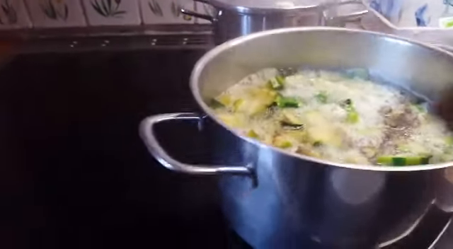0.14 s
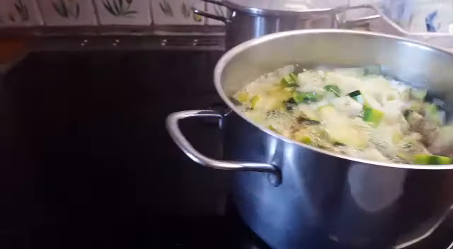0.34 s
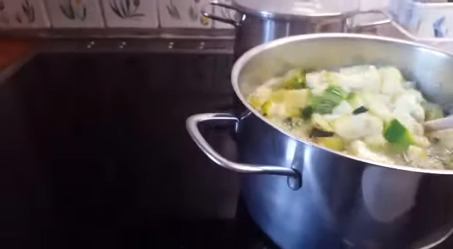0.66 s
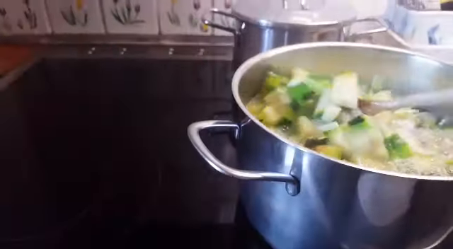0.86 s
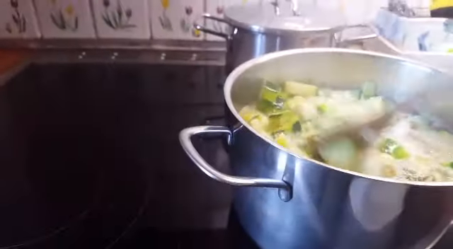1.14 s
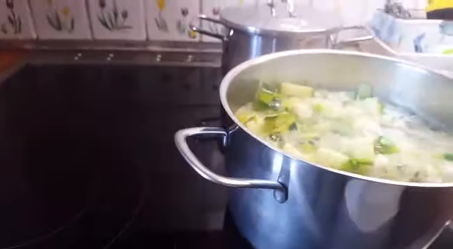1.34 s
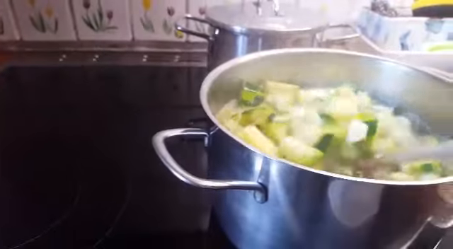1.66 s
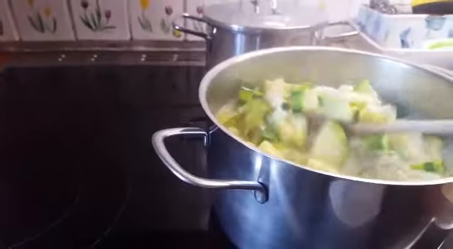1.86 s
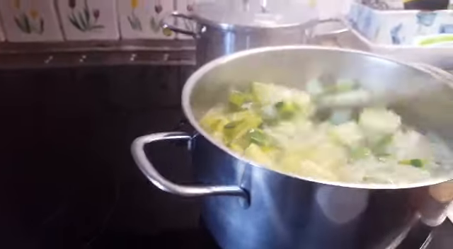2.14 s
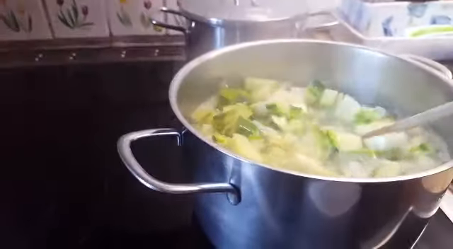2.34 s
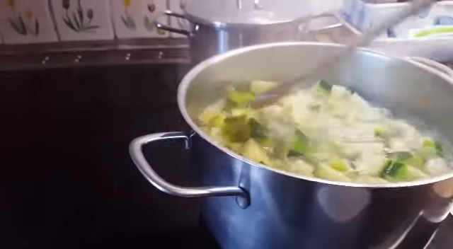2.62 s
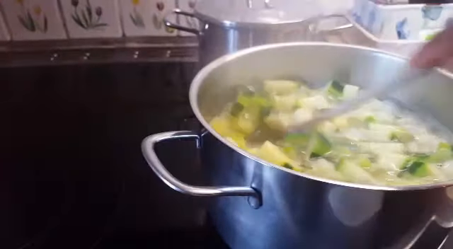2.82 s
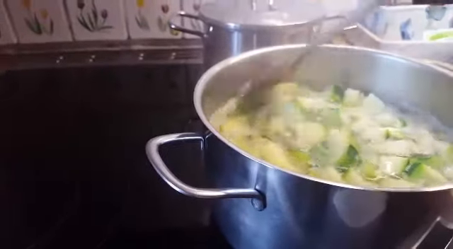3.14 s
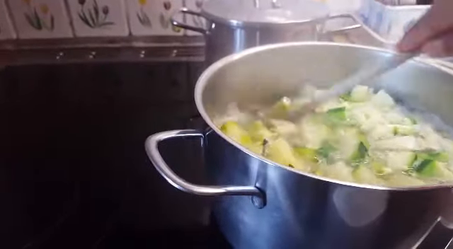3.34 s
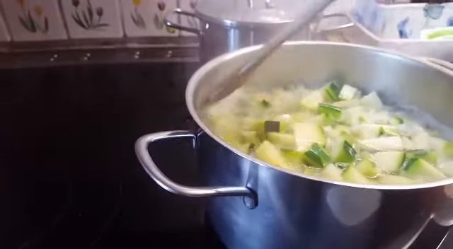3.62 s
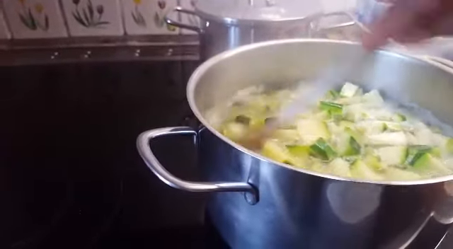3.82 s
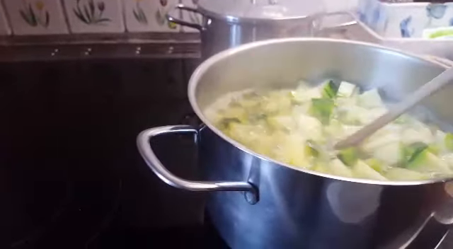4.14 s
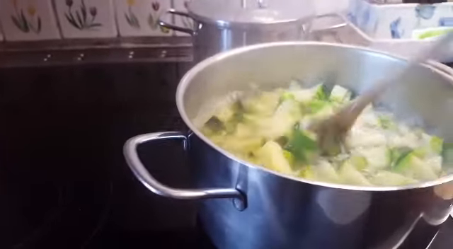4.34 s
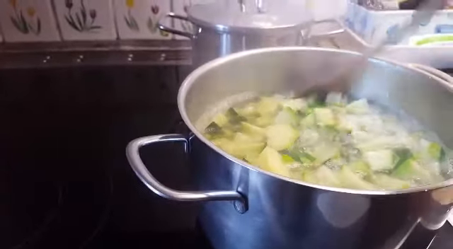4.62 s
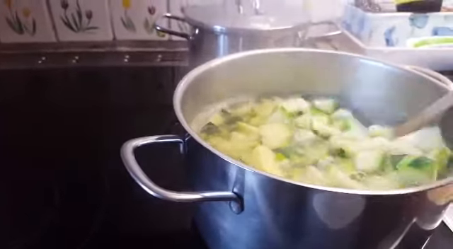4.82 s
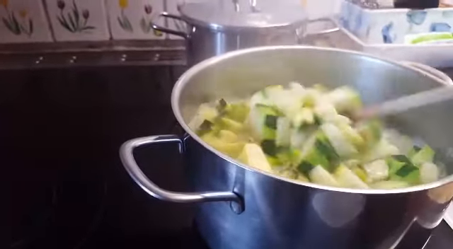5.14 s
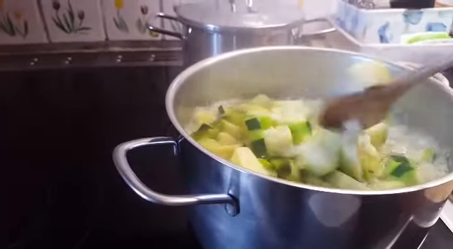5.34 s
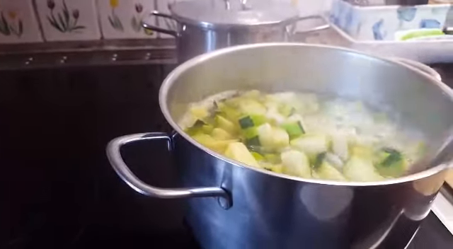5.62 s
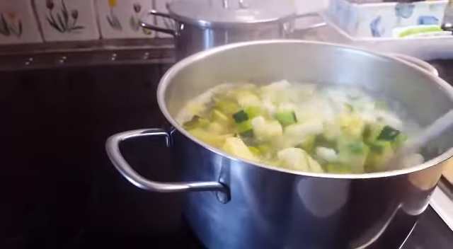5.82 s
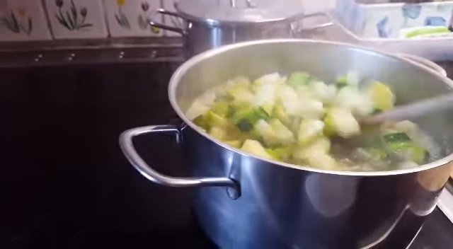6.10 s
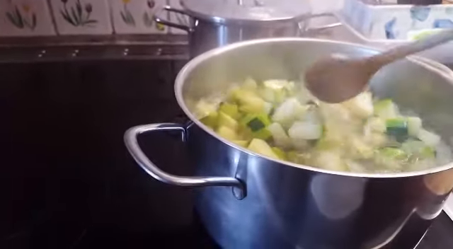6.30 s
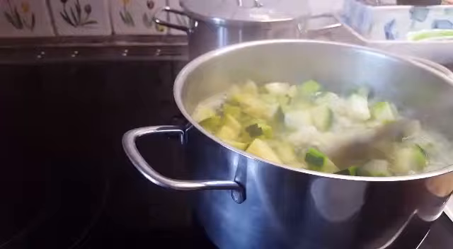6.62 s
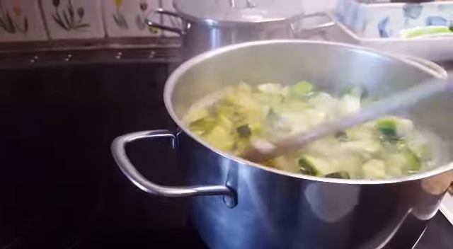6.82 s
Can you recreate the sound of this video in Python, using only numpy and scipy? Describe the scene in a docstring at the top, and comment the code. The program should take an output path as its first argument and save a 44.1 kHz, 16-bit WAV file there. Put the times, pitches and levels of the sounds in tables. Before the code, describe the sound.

Close to a pot on a kitchen stove, soup bubbles with many small uneven plops and spitting droplets. Three quick, dull knocks of a wooden spoon on the steel open the stirring, followed by another knock and brief wet gurgles. One stronger bubble bursts near the middle and the boiling briefly calms. Four spaced knocks follow as the popping grows busier, with a faint hiss and rumble underneath.

```python
"""Thick vegetable soup boils in a wide steel pot, over a soft hiss in a small kitchen.
From the start, steam bubbles pop and echo between the pot walls, droplets spit, and steam collapsing
on the hot base makes the pot rumble. A wooden spoon stirs and knocks the wall three times, then again
at 1.5 s. Near 3 s comes the strongest pop, with more gurgling stirs. The boil calms at about 3.7 s.
From 4.6 s the spoon knocks four more times, and the bubbling picks up toward the end at 7 s."""
import sys
import numpy as np
from scipy import signal
from scipy.io import wavfile

SR = 44100
rng = np.random.default_rng(int(sys.argv[2]) if len(sys.argv) > 2 else 0)


def store_wav(level_fs):
    """Save 16-bit WAV to argv[1]."""
    pcm = np.round(np.clip(np.atleast_2d(level_fs), -1, 1) * 32767)
    wavfile.write(sys.argv[1], SR, pcm.T.astype(np.int16))


N = 306936

# Big bubbles. Each row: start in seconds, strength in dB, clack pitch in Hz, clack share from 0 to 1.
BIG_POPS = [(0.067, -30.5, 1390, 0.9), (0.075, -36.5, 2720, 1), (0.102, -35.5, 1450, 1),
            (0.148, -36.5, 1500, 0.5), (0.409, -25, 1590, 0.68), (0.487, -34.5, 1950, 1),
            (0.53, -31.5, 1310, 0.47), (0.612, -32.5, 1250, 0.3), (0.658, -36.5, 2800, 0.9),
            (0.674, -33, 1300, 0), (0.688, -25.5, 1220, 0.77), (0.761, -33.5, 1310, 0),
            (0.775, -41.5, 1300, 0.3), (0.812, -36, 1830, 0.3), (0.895, -33, 1630, 0.91),
            (0.943, -39, 1470, 0.9), (0.95, -36, 1500, 0.9), (1.137, -35.5, 1420, 0.44),
            (1.148, -34, 1240, 0.9), (1.168, -33.5, 1220, 0.1), (1.211, -44, 1550, 1),
            (1.315, -30, 1390, 0.42), (1.426, -36, 2600, 1), (1.48, -41, 1200, 0.3),
            (1.539, -46, 1610, 0.8), (1.581, -31, 1290, 0.87), (1.994, -36, 1820, 0.96),
            (2.075, -31.5, 1330, 0.63), (2.169, -31, 1310, 0.62), (2.191, -31, 1590, 0.67),
            (2.219, -38, 1890, 0.96), (2.278, -29, 1360, 0.82), (2.287, -37, 2330, 0.75),
            (2.35, -33.5, 1620, 0.73), (2.398, -32, 1240, 0.6), (2.466, -32, 1370, 0),
            (2.503, -36, 1200, 0), (2.533, -30, 1640, 0.3), (2.55, -35, 1280, 0.9),
            (2.564, -36.5, 1600, 0.46), (2.594, -39, 1500, 0.1), (2.616, -38, 2000, 0.86),
            (2.647, -41, 1390, 0.9), (2.655, -38.5, 1790, 0.4), (2.682, -32.5, 1220, 0.86),
            (2.689, -38, 1450, 0.94), (2.745, -30.5, 1440, 0.67), (2.838, -37, 1800, 0.65),
            (2.938, -19.5, 1060, 0.4), (2.945, -25.5, 1170, 0.7), (2.998, -38, 1560, 1),
            (3.024, -29, 1250, 0), (3.076, -43, 1600, 1), (3.093, -33, 1440, 0.83), (3.139, -56, 1400, 0.6),
            (3.167, -39.5, 1470, 0.3), (3.213, -48, 1600, 0.4), (3.225, -31.5, 1350, 0.7),
            (3.245, -40.5, 2140, 0.86), (3.287, -31.5, 1040, 0.67), (3.299, -43, 1500, 0.7),
            (3.336, -40, 1340, 0.6), (3.376, -24, 1890, 0.56), (3.386, -46, 1870, 0.8),
            (3.402, -32, 1430, 1), (3.415, -37, 1820, 0.9), (3.453, -28, 1220, 0.37), (3.476, -32, 1350, 0),
            (3.501, -33.5, 1380, 0.7), (3.522, -38.5, 1500, 0.8), (3.686, -28.5, 1040, 0.77),
            (3.732, -39, 1830, 0.9), (3.751, -35.5, 1830, 0.97), (3.964, -39.5, 2600, 0.95),
            (4.047, -39, 1600, 0.6), (4.234, -35.5, 2390, 0.92), (4.395, -40, 1520, 0.6),
            (4.413, -38, 1700, 0.95), (4.466, -33.5, 1590, 0.93), (4.518, -35, 1250, 0),
            (4.531, -42, 1960, .97), (4.594, -65, 1300, 0.3), (4.707, -38, 1530, 0.7),
            (4.739, -40.5, 1390, 1), (4.777, -36.5, 1390, 0.66), (4.804, -23.5, 1440, 0.99),
            (4.866, -41, 1200, 0.4), (4.912, -31.5, 1460, 0.87), (4.934, -34, 1500, 0.76),
            (5.1, -33, 1130, 0.55), (5.168, -41, 1470, 0.92), (5.289, -36.5, 1430, 1),
            (5.297, -36, 1600, 0.87), (5.401, -35.5, 1880, 0.98), (5.421, -54, 1400, 0.6),
            (5.431, -45, 1390, 1), (5.445, -37, 1700, 0.86), (5.864, -26, 1190, 0.25),
            (5.908, -43.5, 3300, 0.6), (5.916, -36, 1760, 0.04), (6.092, -40, 1410, 0.66),
            (6.204, -36, 1730, 0.6), (6.257, -30.5, 1870, 0.75), (6.288, -37, 1870, 0.95),
            (6.376, -39, 1520, 0.98), (6.393, -44.5, 2160, 1), (6.408, -29, 1500, 0.95),
            (6.478, -37, 1290, 0.3), (6.493, -34.5, 1520, 0.72), (6.503, -42, 1750, 0.86),
            (6.545, -34, 1240, 0.7), (6.616, -35, 1730, 0.9), (6.631, -31, 1460, 0.24),
            (6.796, -33, 1630, 1), (6.824, -43, 3300, 0.9), (6.84, -29.5, 1820, 1), (6.85, -44, 1800, 0.8),
            (6.857, -32, 1650, 0.75), (6.881, -28.5, 1470, 0.5), (6.908, -35, 3180, .98),
            (6.927, -24.5, 1580, 0)]
# Spoon knocks. Each row: start in seconds, strength in dB, centre pitch of the blow in Hz,
# delay of the left side in milliseconds, gain of the wall's high tones in dB.
SPOON_KNOCKS = [(0.1828, -14.5, 1060, 0.16, 4), (0.2554, -14.5, 1800, 0.17, 4),
                (0.3915, -8, 1820, 0.11, -30), (1.4967, -15, 1070, 0.12, -30),
                (4.6181, -17, 1350, 0.033, -24), (4.8122, -19, 1590, 0.16, 10),
                (5.617, -13.5, 1490, 0.13, 6), (6.6406, -22, 1320, .02, -30)]
# Tones of the steel wall, damped by the soup. Each row: pitch in Hz, gain in dB, seconds to fade 60 dB.
WALL_TONES = [(342, -14, 0.065), (475, -16, 0.096), (599, -17.5, 0.042), (787, -6.5, 0.02),
              (1005, -14, 0.046), (1350, -33, 0.015), (1470, -34, 0.051), (1590, -5.5, 0.014),
              (1796, -8, 0.017), (2194, -15, 0.032), (2460, -11, 0.021), (3310, -18, 0.014),
              (4050, -27.5, 0.015), (8000, -32, 0.029)]
# Deep thumps. Each row: start in seconds, strength in dB, pitch in Hz.
DEEP_THUMPS = [(0.189, -29.5, 157), (0.262, -28, 163), (0.392, -24.5, 117), (0.534, -29, 123.5),
               (1.11, -36, 342), (1.27, -33, 345), (1.511, -30, 118), (2.527, -33, 383), (2.94, -27.5, 119),
               (3.005, -32.5, 127), (3.017, -24.5, 345), (3.365, -32, 278), (3.447, -37, 297),
               (4.182, -31, 122), (4.6158, -28.5, 426), (4.809, -25, 122), (5.624, -27.5, 345),
               (5.867, -26.5, 155), (6.249, -32, 324), (6.626, -34, 386), (6.877, -35, 158)]
# Drags of the spoon. Each row: start in seconds, length in seconds, level at the middle in dB.
SPOON_DRAGS = [(0.038, 0.032, -40.5), (0.536, 0.024, -39.5), (2.94, 0.02, -49), (2.992, 0.071, -46),
               (3.165, 0.017, -51), (3.438, 0.05, -44.5), (5.873, 0.083, -51), (6.193, 0.043, -46.5),
               (6.624, 0.027, -43), (6.92, 0.027, -46.5)]
# How hard the soup boils. Each row: time in seconds, then rumble, small pop and hiss levels in dB.
BOIL_LEVELS = [(0.0, -52.5, -51, -62), (0.43, -45.5, -46.5, -57), (1.01, -48.5, -63.5, -58),
               (1.51, -47, -48, -60), (1.7, -50.5, -72, -61), (1.9, -52.5, -68, -60),
               (2.34, -48.5, -51.5, -61.5), (2.8, -49.5, -60, -59.5), (3.05, -52, -59, -62),
               (3.29, -50.5, -58.5, -62), (3.5, -53, -59, -62.5), (3.68, -54.5, -69.5, -62.5),
               (4.67, -53, -65, -62.5), (4.84, -50, -53, -61), (5.19, -53.5, -66, -63),
               (5.65, -49, -55, -63.5), (6.05, -49, -63, -61), (6.4, -53, -61, -63), (6.8, -50, -71, -64.5),
               (6.96, -46.5, -54, -63)]
# Tones of the filled pot. Each row: pitch in Hz, width in Hz, gain in dB.
POT_TONES = [(118.5, 35, 2), (161.8, 47, 0.5), (234, 71, -6.5), (345, 59.5, -1), (473.8, 40, -8),
             (838.5, 48, -7)]
# Short bright puffs: droplets that spit and the sharp edge of spoon knocks.
# Each row: start in seconds, strength in dB, extra gain for the treble in dB.
BRIGHT_PUFFS = [(0.182, -15, -8), (0.243, -12.5, -32), (0.6856, -10, -9.5), (1.343, -24, 2.5),
                (2.197, -17.5, -9), (2.2856, -13, -6.5), (2.349, -14.5, -3), (2.4046, -18, -5),
                (2.625, -20, -1), (2.726, -19, -2.5), (2.837, -21, -19), (3.076, -24, -8.5),
                (3.241, -23.5, -9), (3.378, -19, -4.5), (4.475, -27, 3), (4.618, -17.5, -13),
                (4.739, -29.5, 0.5), (4.775, -24, -11), (4.812, -19, 4.5), (5.39, -21, 3.5),
                (5.6172, -9.5, -9), (6.201, -25, -17), (6.222, -20.5, 0.5), (6.421, -23.5, 1),
                (6.48, -15.5, -4.5), (6.856, -24, -12.5), (6.881, -15, -10), (6.908, -27, -2)]
# Tone colour of the steam and room noise. Each row: frequency in Hz, gain on white noise in dB.
HISS_COLOUR = [(22, -65), (35, -35), (55, -34.5), (80, -34), (300, -38), (550, -45), (1000, -46.5),
               (2500, -59), (4600, -66), (12900, -68), (14800, -79), (16500, -71)]

HOLLOW_HZ = 811   # the air in the pot rings near this pitch
ECHO_DECAY_S, ECHO_DB = 0.014, -2.5   # bounces between the pot walls, before each sound's own loss
DRY_BELOW_DB, JOLT_DB = -25.5, 30.5   # weaker pops echo less; every pop also jolts the pot
LEFT_LAG_MS, LAG_SPREAD_MS = 0.067, 0.1   # pops mostly reach the right side first
HIGH_TONES_HZ = 3000   # only the spoon's hard edge wakes the wall tones above this
SLOSH_DB, SLOSH_DECAY_S = -7.5, 0.0037   # soup thrown about by a knock
TICKS_DB, FIZZ_DB = -3, -6   # added to the hiss level
HISS_REST_DB, RUMBLE_REST_DB = -64.5, -53   # boil levels that leave the hiss colour as it is
KITCHEN_FADE_S, KITCHEN_DB = 0.2, -10   # the room's echo: time to fade 60 dB, gain


def big_pops():
    """Each bursting steam bubble rings the pot's hollow and clacks above it, both rising in pitch."""
    out, jolts, t = np.zeros((2, N)), np.zeros(N), np.arange(600) / SR
    onset = 1 - np.exp(-t / 0.00099)
    for start, db, clack_hz, share in BIG_POPS:
        share = min(share, 0.99)
        hollow_hz = HOLLOW_HZ * (1 + 0.035 * rng.standard_normal())
        hollow = np.sin(2 * np.pi * hollow_hz * t * (1 + 12 * t)) * np.exp(-t * hollow_hz / 1.79)
        clack = np.sin(2 * np.pi * clack_hz * t * (1 + 25 * t)) * np.exp(-t * clack_hz / 0.86)
        splash = butter(rng.standard_normal(len(t)), 1.566 * clack_hz, "low", order=7)
        splash *= from_db(17) * (0.52 + 1.1 * share) * np.exp(-t / 0.00076)   # weak in dull pops
        pop = onset * (from_db(8) * np.sqrt(1 - share ** 2) * hollow + from_db(18) * share * clack + splash)
        pop += from_db(-5.5) * share * pulse(t, clack_hz)   # the bubble's skin snaps
        lag_ms = rng.normal(LEFT_LAG_MS, LAG_SPREAD_MS)
        echoes = pot_echoes(loss_db=max(DRY_BELOW_DB - db, 4.5), left_lag_ms=lag_ms)
        pan_db = rng.normal(0, 1.0)
        gains = from_db([[db + pan_db / 2], [db - pan_db / 2]])
        add(out, start + 0.00031, gains * signal.fftconvolve(pop[None], echoes))
        jolts[round(start * SR)] = from_db(db + JOLT_DB)
    out = butter(out, 750, "high", order=2)
    return butter(out, 6000, "low", order=4) + pot_ring(jolts)


def spoon_knocks():
    """A short blow sets the steel wall ringing, echoes in the pot and sloshes the soup."""
    out, t = np.zeros((2, N)), np.arange(4000) / SR
    wall_hz, wall_db, fade_s = np.transpose(WALL_TONES)[:, :, None]
    after = np.maximum(t - 0.001, 0)   # the wall answers once the blow has peaked
    tones = np.sin(2 * np.pi * wall_hz * after) * from_db(wall_db - 60 * after / fade_s)
    tones *= 1 - np.exp(-after / 0.00049)
    for start, db, hz, lag_ms, high_db in SPOON_KNOCKS:
        tone_db = np.where(wall_hz < HIGH_TONES_HZ, -4 * abs(np.log2(wall_hz / hz)), high_db)
        tone_db += rng.normal(0, 0.53, wall_hz.shape)
        strengths = from_db(tone_db) * rng.choice([-1, 1], wall_hz.shape)
        blow = butter(pulse(t, hz), 4350, "low", order=8) + np.sum(strengths * tones, axis=0)
        echoes = pot_echoes(loss_db=16, count=60, left_lag_ms=lag_ms)
        knock = signal.fftconvolve(blow[None], echoes)[:, :len(t)]
        noise = rng.standard_normal((2, len(t))) + rng.standard_normal(len(t))
        slosh = unit_level(butter(noise, [400, 1.4 * hz], "band", order=5))
        slosh *= np.clip(t / 0.0022, 0, 1) * np.exp(-t / SLOSH_DECAY_S)
        add(out, start - 0.001, from_db(db) * (knock + from_db(SLOSH_DB) * slosh))
    return out


def thumps():
    """The spoon or a large bubble meets the pot: a low ring swells and dies in a few cycles."""
    out, t = np.zeros((2, N)), np.arange(5000) / SR
    for start, db, hz in DEEP_THUMPS:
        ring = np.sin(2 * np.pi * hz * t) * (1 - np.exp(-t * hz / 0.5)) * np.exp(-t * hz / 1.81)
        add(out, start, from_db(db) * signal.fftconvolve(ring[None], pot_echoes(loss_db=12.5)))
    return out


def stirring():
    """The spoon drags through the soup: dense wet clicks swell and fade as a gurgle."""
    t, shared = np.arange(N) / SR, random_clicks(2500, spread_db=4)
    clicks = np.array([shared + 0.41 * random_clicks(2500, spread_db=6) for side in range(2)])
    gurgle = butter(clicks, [620, 1500], "band", order=2) + 1.8 * resonance(clicks, HOLLOW_HZ, 140)
    swells = sum(from_db(db) * np.sin(np.pi * np.clip((t - start) / length, 0, 1))
                 for start, length, db in SPOON_DRAGS)
    return unit_level(gurgle) * swells


def small_pops(level_db):
    """Many small bubbles patter, each at one of twelve pitches over two octaves."""
    clicks = random_clicks(300 * from_db(4 * drift(5)), spread_db=4.5)
    pitch_choice, out = rng.integers(0, 12, N), 0
    for k, hz in enumerate(np.geomspace(700, 3000, 12)):
        soft = butter(clicks * (pitch_choice == k), 1.25 * hz, "low", order=2)   # a bubble starts softly
        ring = resonance(soft, hz, hz / 0.18) * (800 / hz) ** 3.02
        out += signal.oaconvolve(ring[None], pot_echoes(loss_db=4))[:, :N]
    return from_db(level_db) * unit_level(out)


def rumble(level_db):
    """Steam pockets collapse on the hot base and shake the pot."""
    collapses = random_clicks(500 * from_db(3 * drift(10)), spread_db=4.5)
    return from_db(level_db) * unit_level(pot_ring(collapses))


def bright_puffs():
    """Tiny puffs of noise with a fizzing tail: a droplet's spit or the sharp edge of a spoon knock."""
    dull, bright, t = np.zeros((2, N)), np.zeros((2, N)), np.arange(3000) / SR
    shape = (1 - np.exp(-t / 0.0031)) * (np.exp(-t / 0.00086) + 0.064 * np.exp(-t / 0.0098))
    for start, db, treble_db in BRIGHT_PUFFS:
        puff = rng.standard_normal((2, len(t))) * shape
        add(dull, start - 0.0003, from_db(db) * puff)
        add(bright, start - 0.0003, from_db(db + treble_db) * puff)
    return butter(dull, [2600, 7000], "band", order=2) + butter(bright, [7000, 12500], "band", order=1)


def ticks(level_db):
    """Scattered small bubbles burst at the surface with thin, high ticks."""
    clicks = random_clicks(130 * from_db(5 * drift(4)), spread_db=3.5)
    pitch_choice, out = rng.integers(0, 6, N), 0
    for k, hz in enumerate(np.geomspace(1500, 5000, 6)):
        ring = resonance(clicks * (pitch_choice == k), hz, hz / 1.2)
        ring = resonance(ring, hz, hz / 1.2) * (2000 / hz) ** 0.41
        out += signal.oaconvolve(ring[None], pot_echoes(loss_db=11))[:, :N]
    return from_db(level_db) * unit_level(out)


def fizz(level_db):
    """Tiny droplets crackle all the time."""
    clicks = np.array([random_clicks(1500 * from_db(4 * drift(8)), spread_db=3.5) for side in range(2)])
    return from_db(level_db) * unit_level(butter(clicks, [2500, 13000], "band", order=1))


def pot_ring(jolts):
    """The filled pot rings at its own low tones when it is jolted."""
    return sum((-1) ** k * from_db(db) * resonance(jolts, hz, width)
               for k, (hz, width, db) in enumerate(POT_TONES))


def pot_echoes(loss_db, count=30, left_lag_ms=LEFT_LAG_MS):
    """The direct sound, then uneven echoes off the pot walls, different on each side."""
    timing, size = rng.random((2, 2, count))
    delay_s = 0.001157 + 0.91 * ECHO_DECAY_S * timing ** 1.485
    gains = from_db(ECHO_DB - loss_db) * np.exp(-delay_s / ECHO_DECAY_S) * (2 * size - 1)
    direct_at = np.clip([[left_lag_ms], [-left_lag_ms]], 0, 1) * SR / 1000
    echoes = np.clip(1 - abs(np.arange(1200) - direct_at), 0, 1)
    np.add.at(echoes, (np.arange(2)[:, None], (delay_s * SR).astype(int)), gains)
    return echoes


def kitchen_echo(sound):
    """The small room answers with a short, dull echo whose bass is alike on both sides."""
    t = np.arange(SR // 2) / SR
    noise = rng.standard_normal((3, len(t)))
    tail = butter(noise[0], 506, "low", order=2) + butter(noise[1:], 650, "high", order=2)
    tail = butter(tail, 5600, "low", order=1)
    tail *= from_db(-60 * t / KITCHEN_FADE_S) * np.clip(t / 0.0059, 0, 1)
    tail /= np.sqrt(np.sum(tail ** 2) / 2)
    return from_db(KITCHEN_DB) * signal.oaconvolve(sound.mean(axis=0)[None], tail)[:, :N]


def hiss(level_db, rumble_db):
    """Steam and room noise: the treble follows the boil, the deep bass follows the rumble."""
    out, edges_hz = 0, 25 * 2 ** np.arange(0, 9.6, 0.5)   # bands half an octave wide
    noise = rng.standard_normal((2, 2, N))   # neighbouring bands get unrelated noise
    for k, (low, high) in enumerate(zip(edges_hz, edges_hz[1:])):
        hz = np.sqrt(low * high)
        colour_db = read_curve(HISS_COLOUR, hz)
        boil_db = min(hz / 3000, 1) * (level_db - HISS_REST_DB)
        shake_db = 0.61 * (hz < 70) * (rumble_db - RUMBLE_REST_DB)
        flicker_db = 1.3 * drift(14)
        band = butter(noise[k % 2], [low, high], "band", order=2)
        out += from_db(colour_db + boil_db + shake_db + flicker_db) * band
    return out


def pulse(t, hz):
    """A pressure pulse of a cycle and a half, centred at 1 millisecond."""
    phase = (np.pi * hz * (t - 0.001)) ** 2
    return (2 * phase - 1) * np.exp(-phase)


def random_clicks(per_second, spread_db):
    """Clicks of uneven size at random times."""
    sizes = from_db(spread_db * np.minimum(rng.exponential(1, N), 4)) * rng.choice([-1, 1], N)
    return sizes * (rng.random(N) < per_second / SR)


def drift(rate_hz):
    """A smooth random wobble with a typical size of 1."""
    step = 40   # samples between wobble points
    r = np.exp(-2 * np.pi * rate_hz * step / SR)
    slow = signal.lfilter([1], [1, -2 * r, r * r], rng.standard_normal(N // step + 2002))[2000:]
    return np.interp(np.arange(N) / step, np.arange(len(slow)), unit_level(slow))


def resonance(x, hz, width_hz):
    """Lets one pitch ring; a narrower width rings longer."""
    r = np.exp(-np.pi * width_hz / SR)
    gain, feedback = (1 - r * r) / 2, [1, -2 * r * np.cos(2 * np.pi * hz / SR), r * r]
    return signal.lfilter([gain, 0, -gain], feedback, x + 1e-18)


def butter(x, hz, kind, order):
    """A filter that keeps the lows, the highs or a band; a higher order cuts more sharply."""
    return signal.sosfilt(signal.butter(order, hz, kind, fs=SR, output="sos"), x + 1e-18)


def read_curve(points, hz):
    """Reads between a table's rows, giving each octave equal room."""
    points_hz, values = np.transpose(points)
    return np.interp(np.log(hz), np.log(points_hz), values)


def from_db(db):
    """Turns dB into a number to multiply by."""
    return 10 ** (np.asarray(db) / 20)


def unit_level(x):
    """Scales a signal to an average (rms) level of 1."""
    return x / np.sqrt(np.mean(x ** 2) + 1e-20)


def add(out, start_s, sound):
    """Mixes a stereo sound in at its start time."""
    i = round(start_s * SR)
    out[:, i:i + sound.shape[1]] += sound[:, :N - i]


def scene():
    """The boiling, stirred pot, its echo in the kitchen and the hiss."""
    times, *levels = np.transpose(BOIL_LEVELS)
    rumble_db, patter_db, hiss_db = [np.interp(np.arange(N) / SR, times, db) for db in levels]
    pot = big_pops() + spoon_knocks() + thumps() + stirring()
    pot += small_pops(patter_db) + rumble(rumble_db) + bright_puffs()
    pot += ticks(hiss_db + TICKS_DB) + fizz(hiss_db + FIZZ_DB)
    return pot + kitchen_echo(pot) + hiss(hiss_db, rumble_db)


def record(dry):
    """Two microphone openings close together hear nearly the same bass; the highest treble is cut."""
    mid, side = (dry[0] + dry[1]) / 2, (dry[0] - dry[1]) / 2
    side = 0.26 * side + 0.6 * butter(side, 520, "high", order=1)
    soft = butter(np.array([mid + side, mid - side]), 15200, "low", order=4)
    return signal.sosfilt(signal.cheby2(12, 70, 16500, fs=SR, output="sos"), soft)


dry = scene()
out = record(dry)
store_wav(out)
```